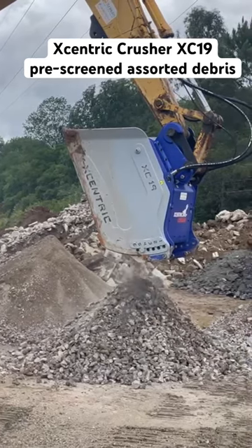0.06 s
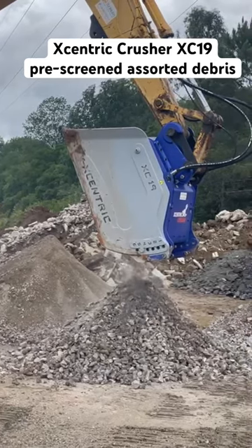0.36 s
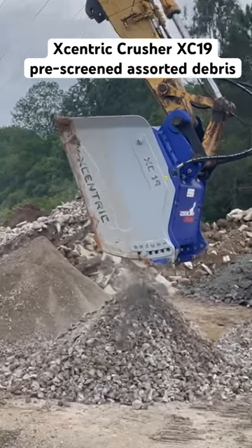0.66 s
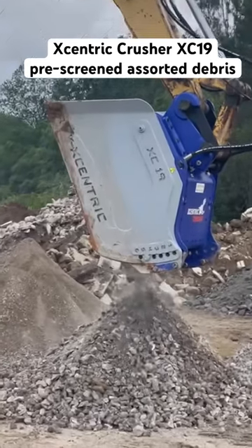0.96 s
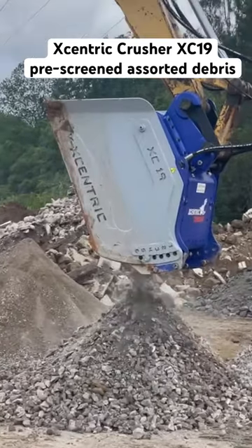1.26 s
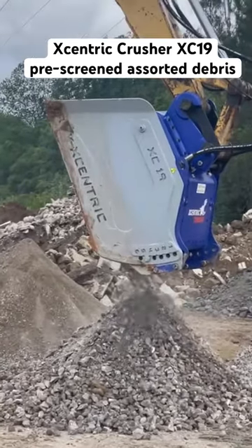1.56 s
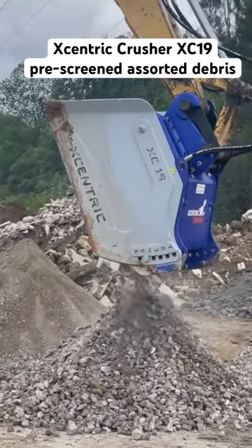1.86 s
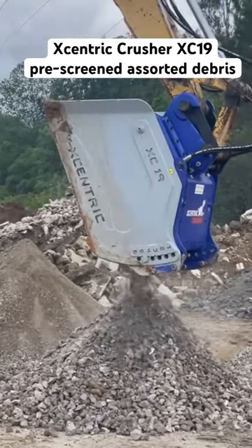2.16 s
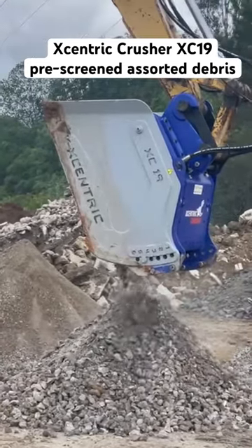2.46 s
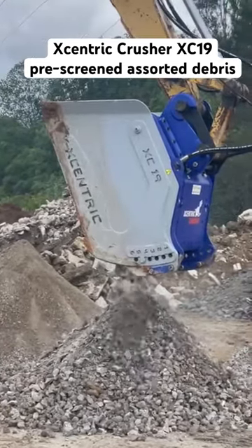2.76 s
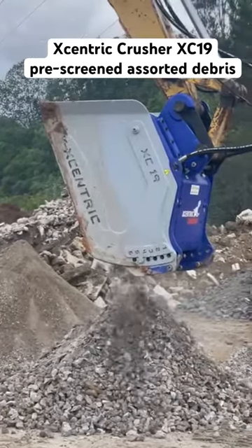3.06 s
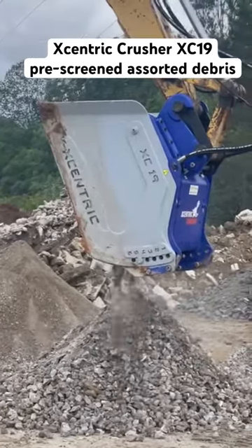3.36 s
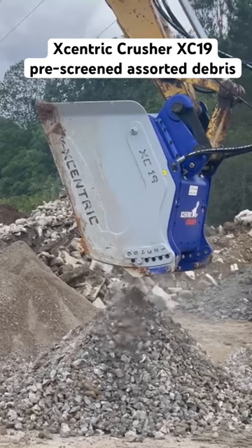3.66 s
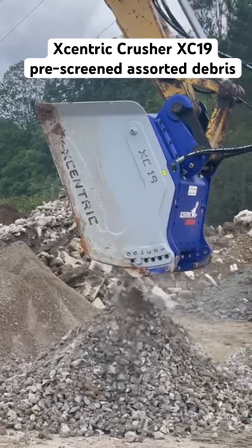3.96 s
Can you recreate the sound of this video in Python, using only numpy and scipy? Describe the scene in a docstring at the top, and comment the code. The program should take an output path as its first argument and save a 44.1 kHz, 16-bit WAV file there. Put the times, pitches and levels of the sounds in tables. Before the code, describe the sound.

Stone being crushed in a steel excavator bucket, rapid crunching thuds over a droning diesel engine.

```python
"""Stone crunches and steel booms about six times a second, over the drone of a diesel.
An excavator's crusher bucket chews rubble in an open yard: each bite of the jaw fractures stone and
thuds through the shell, and the jaw clanks on its way back. Stones snap, lumps bang, and a few jam
and set the steel ringing. Rubble churns inside while crushed gravel patters onto the heap.
The level ducks after the hardest bite."""
import sys
import numpy as np
from scipy import signal
from scipy.fft import rfft, irfft, next_fast_len
from scipy.io import wavfile
from scipy.ndimage import uniform_filter1d

SR = 44100
rng = np.random.default_rng(int(sys.argv[2]) if len(sys.argv) > 2 else 0)


def wav_record(signal):
    """Record a signal, one row per channel, as 16-bit PCM in the file named by sys.argv[1]."""
    frames = np.transpose(np.atleast_2d(signal))
    bounded = np.clip(frames, -1, 1)
    # unit amplitude maps onto the largest positive 16-bit level
    quanta = np.round(bounded * 32767).astype(np.int16)
    wavfile.write(sys.argv[1], SR, quanta)


N = 176400
TIME = np.arange(N) / SR
FFT_SIZE = next_fast_len(N + SR // 2, real=True) // 2 * 2
HZ = np.maximum(np.arange(FFT_SIZE // 2 + 1) * SR / FFT_SIZE, 1)


def from_db(db):
    """Decibels to gain."""
    return 10 ** (np.asarray(db) / 20)


def unit_rms(x):
    """Scale to an rms of 1."""
    return x / np.sqrt(np.mean(x ** 2) + 1e-20)


def over_hz(curve):
    """Read a curve on a log-frequency axis."""
    hz, value = np.transpose(curve)
    return np.interp(np.log(HZ), np.log(hz), value)


def drift(rate_hz):
    """Smooth random modulation with an rms of 1."""
    step, warm_up = 40, 2000
    pole = np.exp(-2 * np.pi * rate_hz * step / SR)
    noise = rng.standard_normal(N // step + warm_up + 2)
    slow = signal.lfilter([1], [1, -2 * pole, pole ** 2], noise)[warm_up:]
    return np.interp(np.arange(N) / step, np.arange(len(slow)), unit_rms(slow))


def colour(x, spectrum):
    """Minimum-phase EQ, rolled off an octave above its last point; white noise keeps its power."""
    gain = from_db(over_hz(spectrum)) / (1 + (HZ / (2 * spectrum[-1][0])) ** 4)
    cepstrum = irfft(np.log(unit_rms(gain) + 1e-7))
    cepstrum[1:FFT_SIZE // 2] *= 2
    cepstrum[FFT_SIZE // 2 + 1:] = 0
    return irfft(rfft(x, FFT_SIZE) * np.exp(rfft(cepstrum)))[:N]


def grains(per_s, spread_db):
    """Random clicks of uneven size, one for each tiny contact; rms 1."""
    sizes = from_db(spread_db * np.minimum(rng.exponential(1, N), 4)) * rng.choice([-1, 1], N)
    return unit_rms(sizes * (rng.random(N) < per_s / SR))


def swells(times, holds, levels_db, rise_s, fall_s):
    """Envelope of a run of hits: each rises up to its time, holds and dies away."""
    power = np.zeros(N)
    for at, hold, db in zip(times, np.broadcast_to(holds, len(times)), levels_db):
        fade = np.maximum(at - TIME, 0) / rise_s + np.maximum(TIME - at - hold, 0) / fall_s
        power += (from_db(db) * np.exp(-np.minimum(fade, 20))) ** 2
    return np.sqrt(power)


def struck_mode(at, hz, db, fall_s, rise_s=0.0047):
    """One mode of struck steel: a sine that swells quickly and decays."""
    age = np.maximum(TIME - at, 0)
    envelope = (1 - np.exp(-age / rise_s)) * np.exp(-np.minimum(age / fall_s, 20))
    return from_db(db) * np.sin(2 * np.pi * hz * age) * envelope


def yard_echo(fall_s=0.0083):
    """Frequency response of a short scatter off the ground and the heaps; about unit power."""
    tail = rng.standard_normal(N) * np.exp(-np.minimum(TIME / fall_s, 20))
    return rfft(tail, FFT_SIZE) * np.sqrt(2 / (fall_s * SR))


# Hum of the engine and hydraulic drive: (pitch [Hz], level [dB], phase waver [rad])
ENGINE_TONES = [(92.9, -29, 0.65), (102.1, -19.5, 0.2), (150, -29.5, 0.42), (225.8, -38.5, 1),
                (275.3, -35.5, 1), (489.4, -46, 0.97)]
# Low-end bed under the hum: (frequency [Hz], relative level [dB])
RUMBLE_EQ = [(20, -28), (33, -24.5), (50, -11.5), (72, 0), (105, -2.5), (135, 0.5), (180, -12.5),
             (500, -23.5)]

def engine():
    """The diesel's firing tone and the drive's weaker tones waver over a deep rumble."""
    tones = np.zeros(N)
    for hz, db, waver in ENGINE_TONES:
        phase = 2 * np.pi * (hz * TIME + rng.random()) + waver * drift(rate_hz=2.6)
        tones += from_db(db) * np.sqrt(2) * np.sin(phase)
    return tones + from_db(-20.5) * colour(rng.standard_normal(N), RUMBLE_EQ)


# Fader ride for the amount of rubble on the move: (time [s], gain [dB])
FEED_RIDE = [(0, -0.5), (1.4, -0.5), (2.3, 0.5), (2.65, -2), (3.2, 0), (4, -2)]
# Dull tumble inside the bucket: (frequency [Hz], relative level [dB])
CHURN_EQ = [(90, -18.5), (160, -6.5), (260, 1), (680, -3.5), (800, -6.5), (1250, -19.5), (6000, -45)]
# Bright patter on the heap: (frequency [Hz], relative level [dB])
GRAVEL_EQ = [(400, 2.5), (1000, 8.5), (4200, -6.5), (5600, -6.5), (7000, -12), (11800, -18)]

def rubble():
    """Lumps tumble in the bucket; fine gravel and larger, ticking stones land on the heap."""
    feed_db = np.interp(TIME, *np.transpose(FEED_RIDE))
    churn = grains(per_s=1200, spread_db=1) * from_db(-24.5 + feed_db + 1.4 * drift(rate_hz=15))
    gravel = grains(per_s=4500, spread_db=0.5) * from_db(-38 + feed_db + 0.47 * drift(rate_hz=28))
    stones = np.zeros(N)
    for hz in np.geomspace(1600, 4200, num=12):
        landings = grains(per_s=16, spread_db=3) + 1e-18
        stones += signal.lfilter(*signal.iirpeak(hz, Q=4.5, fs=SR), landings)
    gravel += from_db(-46.5 + feed_db) * unit_rms(stones)
    return colour(churn, CHURN_EQ), colour(gravel, GRAVEL_EQ)


# Return strokes of the jaw: (time [s], level [dB])
CLANK_CUES = [(0.158, -29.5), (.345, -31.5), (0.48, -26.5), (.631, -30), (.789, -24.5), (0.94, -29),
              (1.099, -30), (1.256, -24.5), (1.423, -25.5), (1.573, -22), (1.730, -34.5), (1.891, -22),
              (2.042, -27), (2.201, -25), (2.35, -28.5), (2.671, -30.5), (2.833, -27.5), (2.989, -28.5),
              (3.138, -30), (3.299, -30), (3.457, -32.5), (3.61, -31), (3.772, -35.5)]
# Hard midrange of the clank: (frequency [Hz], relative level [dB])
CLANK_EQ = [(300, -21), (900, 1.5), (1170, 8.5), (1520, -3), (1800, -16), (4000, -30.5)]

def clanks():
    """The jaw swings back between bites with a short, gritty metallic rattle."""
    times, db = np.transpose(CLANK_CUES)
    envelope = swells(times, 0.012, db, rise_s=0.0012, fall_s=0.039)
    return colour(grains(per_s=1500, spread_db=0.5) * envelope, CLANK_EQ)


# Ring of the steel bucket:
# (pitch [Hz], bandwidth [Hz], gain over the direct sound [dB], relative level as a jam lets go [dB])
SHELL_MODES = [(141.5, 12, 2.5, -24), (222.7, 12.3, 8.5, -3), (283.4, 10.2, 1.5, -19),
               (312.4, 6.9, 2, -24.5), (480.4, 5.4, -2, -25), (588.6, 18, -6, -17.5), (700, 36, -2.5, -25),
               (917, 12, -1.5, -11.5), (1341, 13, -0.5, -9), (1376, 18, -4, -15), (1532, 100, -3.5, -23.5),
               (1780, 26, -4, -18.5), (2903, 20, -1.5, -25)]

def shell(contacts):
    """Contacts ring through the steel shell, one resonator for each mode."""
    ring = np.zeros(N)
    for hz, width, db, _ in SHELL_MODES:
        radius = np.exp(-np.pi * width / SR)
        feedforward = np.array([1, 0, -1]) * (1 - radius ** 2) / 2
        feedback = [1, -2 * radius * np.cos(2 * np.pi * hz / SR), radius ** 2]
        ring += from_db(db) * signal.lfilter(feedforward, feedback, contacts)
    return ring


# Stones jamming against the steel: (time [s], push level [dB], ring gain [dB])
JAM_CUES = [(1.198, -18, -17), (1.515, -26, -10), (2.451, -7, 5.5), (2.925, -20, -22)]
# Grind of the push: (frequency [Hz], relative level [dB])
JAM_EQ = [(200, -11), (950, 11), (1400, 13), (3000, -27.5)]

def jams():
    """A jammed stone grinds on the shell and lets go: the modes ring out, and close pairs beat."""
    times, push_db, _ = np.transpose(JAM_CUES)
    push = rng.standard_normal(N) * swells(times, 0.016, push_db, rise_s=0.001, fall_s=0.013)
    ring = sum((-1) ** k * struck_mode(0, hz, db, fall_s=1 / (np.pi * width))
               for k, (hz, width, _, db) in enumerate(SHELL_MODES))
    releases = sum(from_db(db) * np.interp(TIME - at, TIME, ring) for at, _, db in JAM_CUES)
    return shell(colour(push, JAM_EQ)) + releases


# Large lumps hitting a plate: (time [s], pitch [Hz], level [dB])
BANG_CUES = [(.250, 266.5, -5.5), (.274, 227.6, -8.5), (1.516, 667, -10), (1.667, 350, -8.5),
             (2.768, 683, -10), (2.922, 965, -13.5), (3.562, 279, -8), (3.566, 695, -10.5)]

def bangs():
    """Lumps strike tight, pitched knocks from plates that the rubble damps."""
    return sum(struck_mode(at, hz, db, fall_s=0.013) for at, hz, db in BANG_CUES)


# Single stones splitting: (time [s], snap level [dB], knock level [dB], fragment pitch [Hz])
SPLIT_CUES = [(.230, -15.5, -23.5, 2260), (0.25, -27, -14, 2040), (0.276, -22.5, -20, 1990),
              (0.394, -15, -17, 2460), (0.519, -27, -26, 1500), (0.785, -38, -23.5, 1540),
              (0.885, -19, -21, 2800), (1.198, -25, -15, 2320), (1.334, -33, -26, 2730),
              (1.514, -32.5, -15.5, 2200), (2.292, -28, -20.5, 1830), (2.39, -30.5, -26.5, 2020),
              (2.442, -26.5, -23, 2810), (2.447, -12.5, -13, 2210), (2.591, -32, -28, 2740),
              (2.748, -22, -27, 1790), (2.764, -15.5, -15.5, 2240), (2.915, -17, -24, 2190),
              (3.248, -35.5, -26, 2500), (3.557, -31.5, -12, 1960)]
# Crisp breaking stone, for splits and bites: (frequency [Hz], relative level [dB])
CRUNCH_EQ = [(400, 1), (2200, 3), (4300, -5.5), (5800, -6.5), (7200, -15.5), (8600, -12.5), (11800, -25)]
# Boxy knock of the plates, for splits and bites: (frequency [Hz], relative level [dB])
KNOCK_EQ = [(150, -17.5), (350, -1), (650, 2.5), (1250, -1.5), (1600, -13.5), (2400, -13), (5000, -63)]

def splits():
    """A stone snaps and kicks the plates; its fragments clatter around a pitch set by their size."""
    times, snap_db, knock_db, _ = np.transpose(SPLIT_CUES)
    rise_s, fragment_boost_db = 0.00047, 6.5
    snap = grains(per_s=8300, spread_db=1.5) * swells(times, 0, snap_db, rise_s, fall_s=0.0027)
    knock = grains(per_s=5000, spread_db=1.5) * swells(times, 0, knock_db, rise_s, fall_s=0.006)
    cracks = colour(snap, CRUNCH_EQ) + colour(knock, KNOCK_EQ)
    fragments = grains(per_s=2000, spread_db=1.5)
    for at, db, _, hz in SPLIT_CUES:
        band = signal.butter(2, [hz / 1.3, hz * 1.3], "band", fs=SR, output="sos")
        envelope = swells([at], 0, [db + fragment_boost_db], rise_s, fall_s=0.007)
        cracks += signal.sosfilt(band, fragments * envelope)
    return cracks


# Bites of the jaw, with each layer's level ahead of its trim:
# (time [s], hold [s], stone crunch [dB], plate knock [dB], shell thud [dB])
BITE_CUES = [(0.091, 0.02, -28.5, -17.5, -8), (0.224, 0.051, -25.5, -21.5, -12.5),
             (0.392, 0.016, -23.5, -17, -11), (0.566, 0.013, -33, -17.5, -12.5),
             (0.734, 0.011, -35.5, -26.5, -32), (0.891, 0.013, -25.5, -19.5, -11.5),
             (1.011, 0.037, -29, -20, -15.5), (1.176, 0.045, -31.5, -21, -19),
             (1.345, 0.033, -26, -18, -23), (1.483, 0.034, -24.5, -17, -22), (1.657, 0.01, -29, -18, -14.5),
             (1.813, .026, -31.5, -22.5, -15.5), (1.983, 0.008, -30.5, -21.5, -25),
             (2.132, 0.029, -34, -28.5, -9.5), (2.29, 0.0078, -31.5, -17, -11),
             (2.449, 0.017, -20.5, -9.5, -7), (2.594, 0.0092, -35, -16.5, -15),
             (2.757, 0.025, -21, -15.5, -10), (2.92, 0.018, -24.5, -15, -12.5),
             (3.079, 0.0083, -27, -16.5, -14), (3.235, 0.019, -30, -26.5, -19.5),
             (3.385, 0.0076, -32, -38.5, -17), (3.559, 0.015, -33.5, -13, -7),
             (3.694, 0.012, -35.5, -29.5, -22), (3.866, 0.0051, -33, -34, -20)]
# Low boom of the shell: (frequency [Hz], relative level [dB])
THUD_EQ = [(60, -32.5), (130, -1.5), (205, 3.5), (420, -4), (800, -34.5), (2000, -43.5)]

def bites():
    """Each closing of the jaw: a burst of tiny fractures, then knocks on the plates and a thud."""
    times, holds, crunch_db, knock_db, thud_db = np.transpose(BITE_CUES)
    knock_lag_s, thud_lag_s = 0.0012, 0.0076
    crunch_trim_db, knock_trim_db, thud_trim_db = -4, -5, -6
    crunch = grains(per_s=3000, spread_db=1)
    crunch *= swells(times, holds, crunch_db + crunch_trim_db, rise_s=0.014, fall_s=0.015)
    knock = grains(per_s=1500, spread_db=1.5)
    knock *= swells(times + knock_lag_s, holds, knock_db + knock_trim_db, rise_s=0.0082, fall_s=0.031)
    thud = grains(per_s=900, spread_db=4.5)
    thud *= swells(times + thud_lag_s, holds, thud_db + thud_trim_db, rise_s=0.0059, fall_s=0.027)
    return colour(crunch, CRUNCH_EQ) + colour(knock, KNOCK_EQ) + colour(thud, THUD_EQ)


# Pan across the spectrum: (frequency [Hz], left minus right [dB])
STEREO_PAN = [(120, 8.5), (290, -1), (400, -2), (740, 0), (960, -6), (1280, -8), (1800, -0.5)]
# Phase between the channels: (frequency [Hz], left lead [rad])
STEREO_PHASE = [(150, 0), (420, 0.84), (860, -1.71), (1450, 0), (4200, 0), (4800, 1.4), (5100, 0),
                (6200, 0.3), (7000, 1.08), (8700, np.pi)]
# Width from scattered sound: (frequency [Hz], level against the direct sound [dB])
STEREO_WIDTH = [(110, -44.5), (220, -24), (500, -6), (750, -14), (1450, -2), (1900, -30.5), (3900, -34.5),
                (4800, -7), (5300, -15.5), (7200, -19.5), (8100, -16), (9000, -43)]

def stereo_image(spectrum, mono_below_hz=150):
    """The sound reaches two microphones with differing level, phase and scatter."""
    side = np.array([[1], [-1]]) / (1 + (mono_below_hz / HZ) ** 8)
    pan = from_db(side * over_hz(STEREO_PAN) / 2)
    phase = np.exp(0.5j * side * over_hz(STEREO_PHASE))
    scatter = from_db(over_hz(STEREO_WIDTH))
    width = (1 + side * scatter * yard_echo()) / np.sqrt(1 + scatter ** 2)
    return irfft(spectrum * pan * phase * width)[:, :N]


def scene():
    """Crushing rings the shell and echoes faintly in the yard, over the engine's drone."""
    churn, gravel = rubble()
    contacts = bites() + splits() + churn
    crusher = contacts + shell(contacts) + jams() + bangs() + clanks() + gravel
    in_yard = rfft(crusher, FFT_SIZE) * (1 + from_db(-18) * yard_echo())
    return stereo_image(in_yard + rfft(engine(), FFT_SIZE))


def record(dry):
    """Gain control ducks on loud bites and recovers slowly; peaks are rounded and the top is cut."""
    threshold_db, recovery_db_per_s, ceiling, cutoff_hz = -7.5, 11, 1.52, 11750
    power = uniform_filter1d(np.mean(dry ** 2, axis=0), size=700)
    over_db = np.maximum(10 * np.log10(np.maximum(power, 1e-9)) - threshold_db, 0)
    recovery_db = recovery_db_per_s * TIME
    duck_db = np.maximum.accumulate(over_db + recovery_db) - recovery_db
    ducked = dry * from_db(-uniform_filter1d(duck_db, size=200))
    rounded = ceiling * np.tanh(ducked / ceiling)
    return signal.sosfiltfilt(signal.butter(24, cutoff_hz, fs=SR, output="sos"), rounded)


dry = scene()
out = record(dry)
wav_record(out)
```